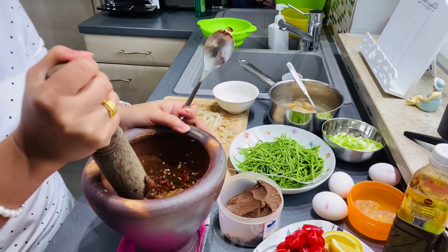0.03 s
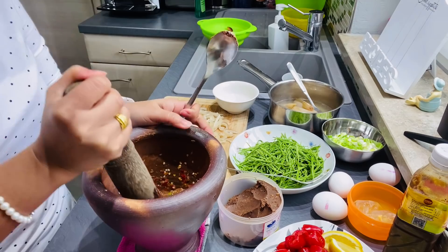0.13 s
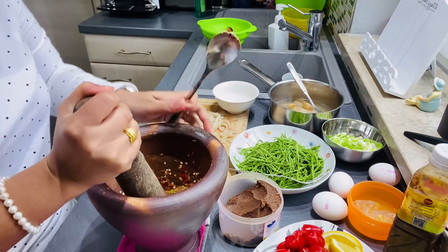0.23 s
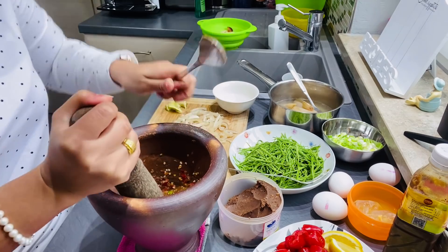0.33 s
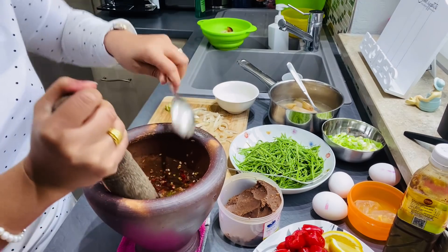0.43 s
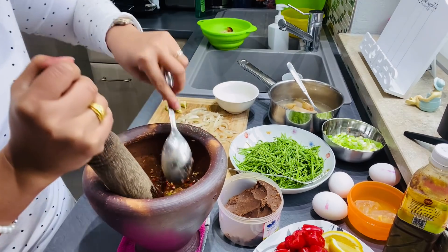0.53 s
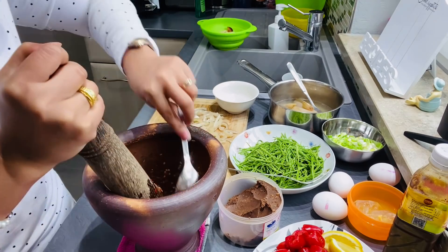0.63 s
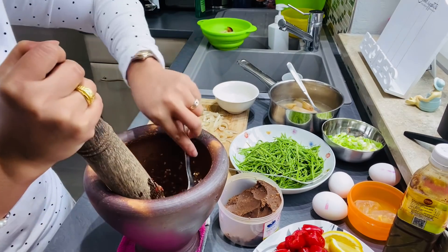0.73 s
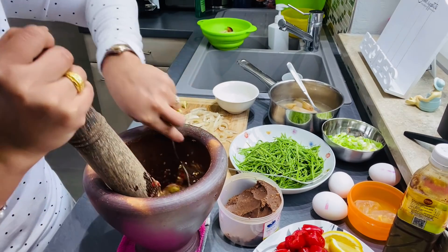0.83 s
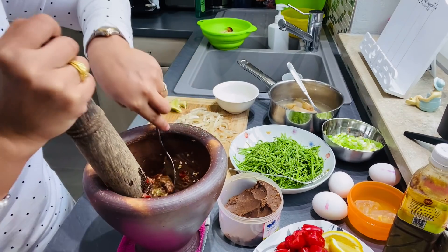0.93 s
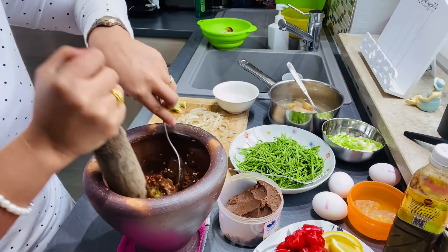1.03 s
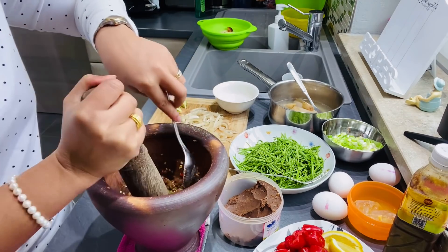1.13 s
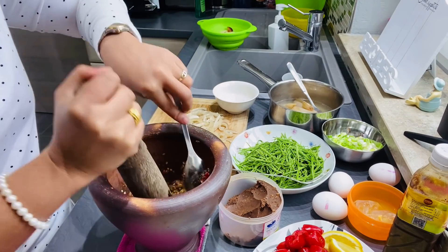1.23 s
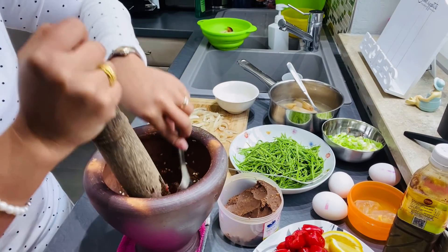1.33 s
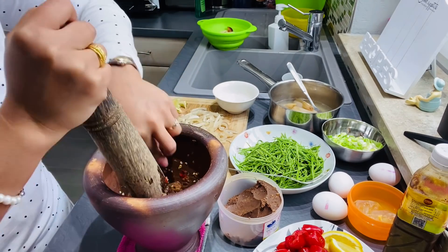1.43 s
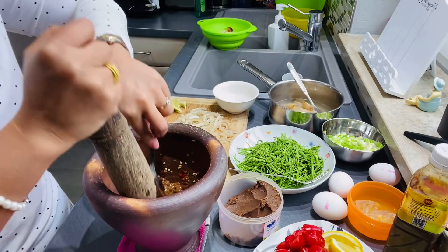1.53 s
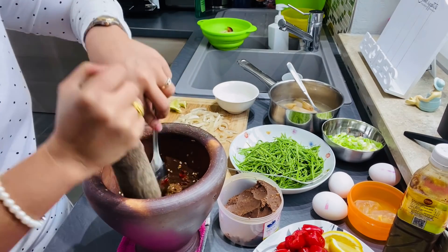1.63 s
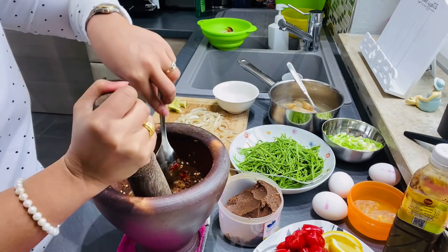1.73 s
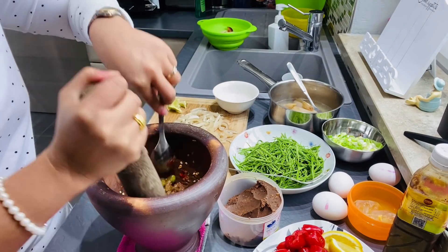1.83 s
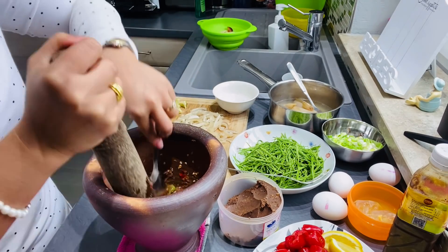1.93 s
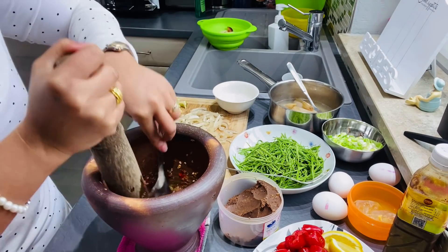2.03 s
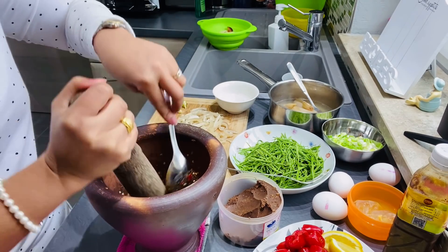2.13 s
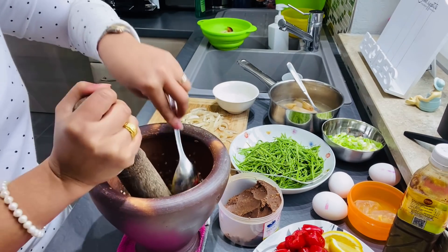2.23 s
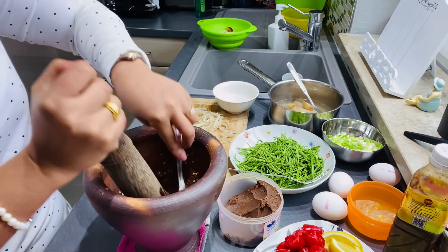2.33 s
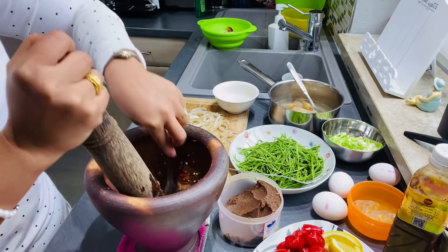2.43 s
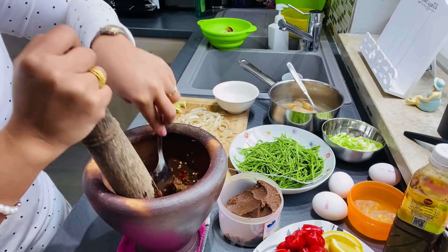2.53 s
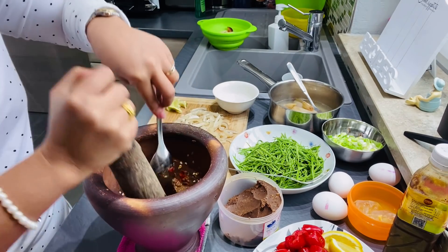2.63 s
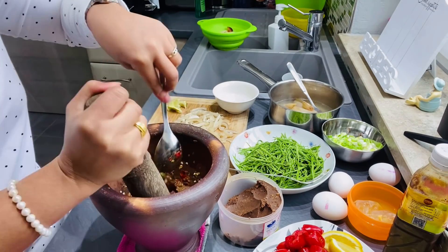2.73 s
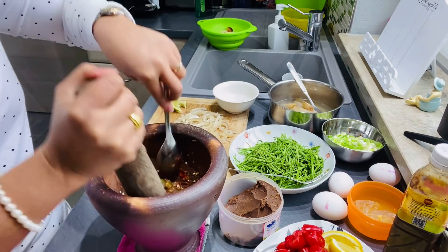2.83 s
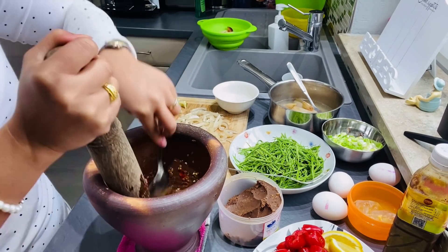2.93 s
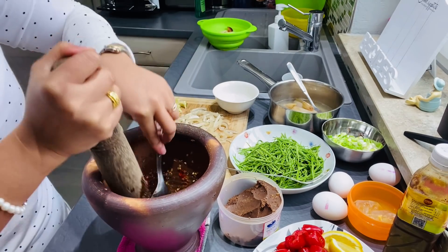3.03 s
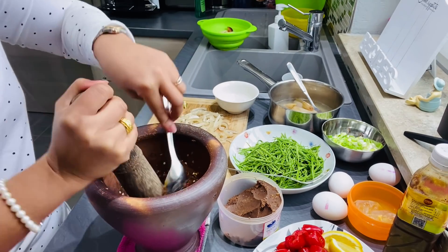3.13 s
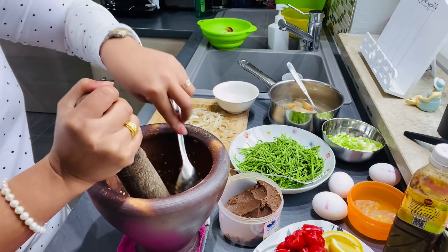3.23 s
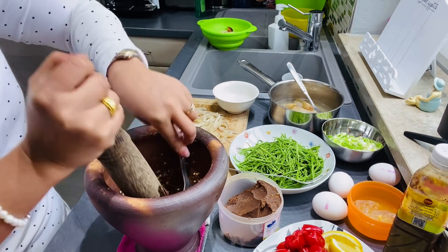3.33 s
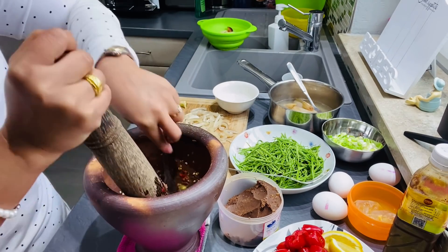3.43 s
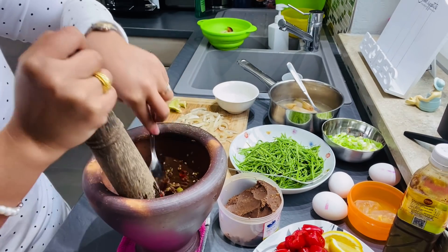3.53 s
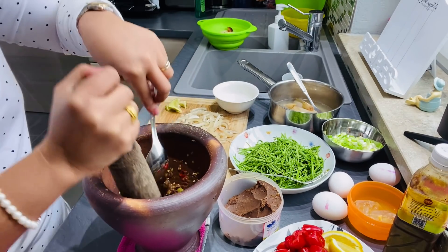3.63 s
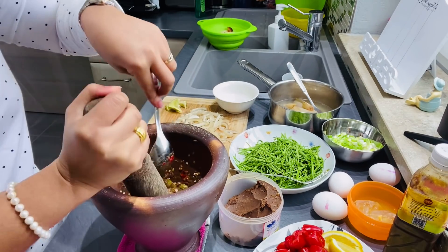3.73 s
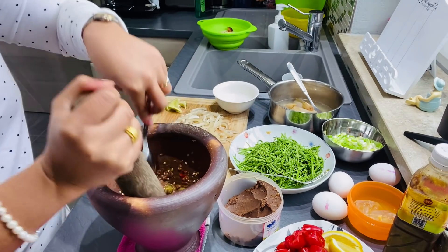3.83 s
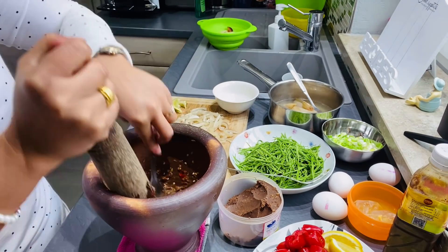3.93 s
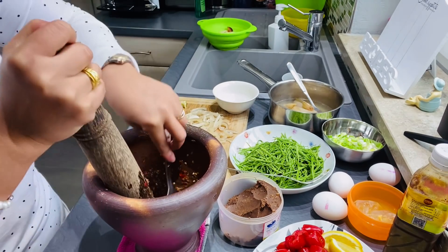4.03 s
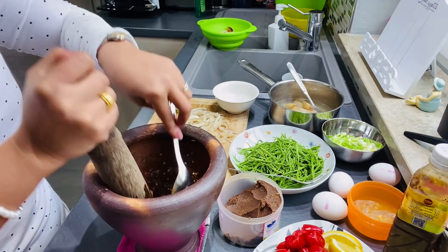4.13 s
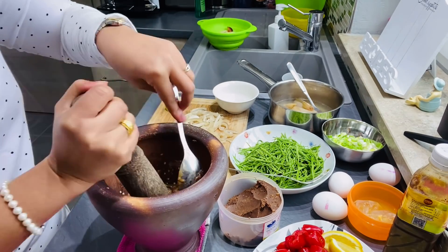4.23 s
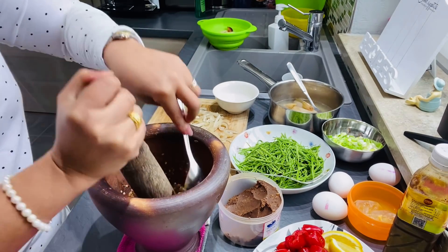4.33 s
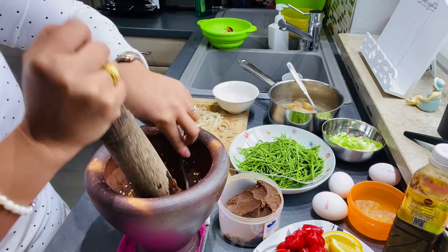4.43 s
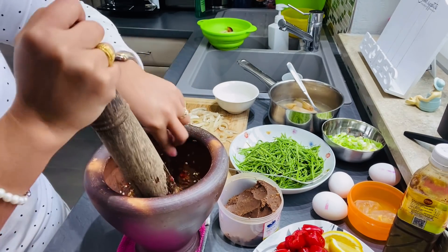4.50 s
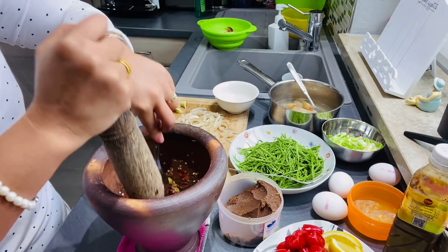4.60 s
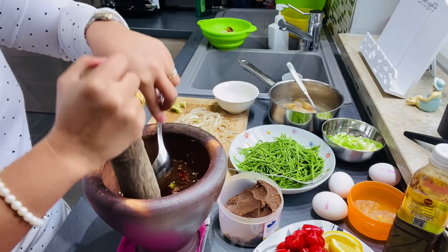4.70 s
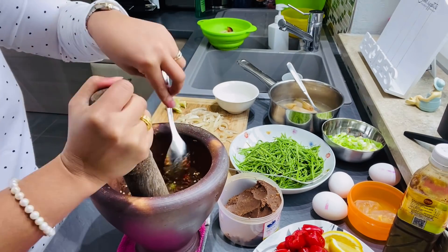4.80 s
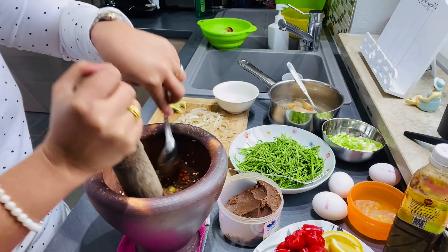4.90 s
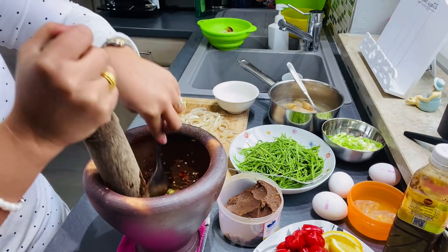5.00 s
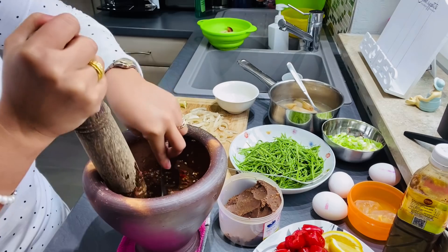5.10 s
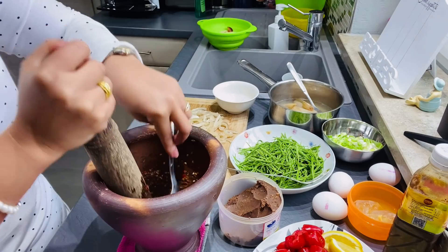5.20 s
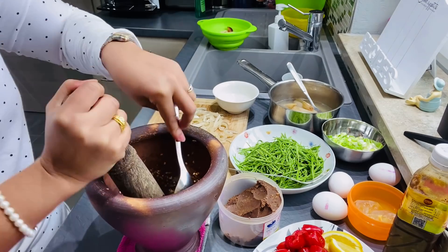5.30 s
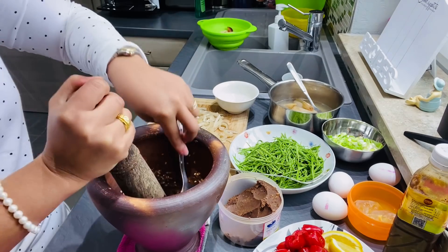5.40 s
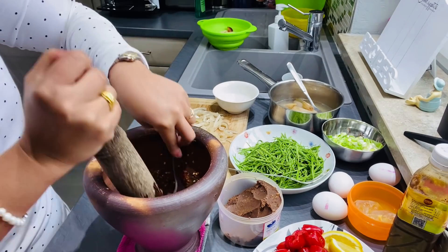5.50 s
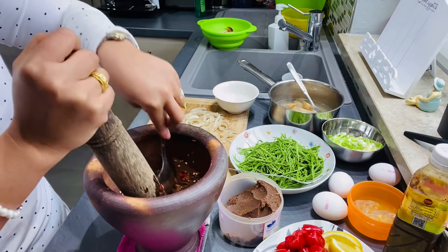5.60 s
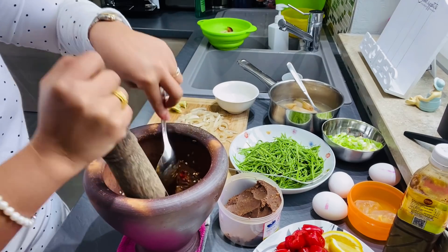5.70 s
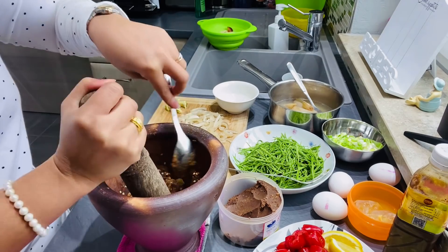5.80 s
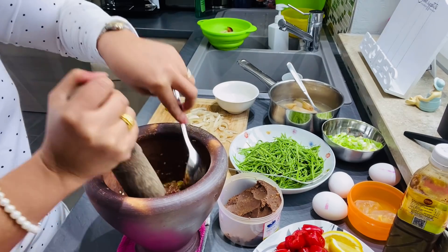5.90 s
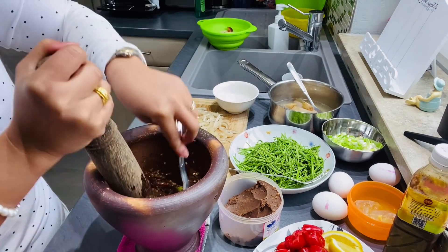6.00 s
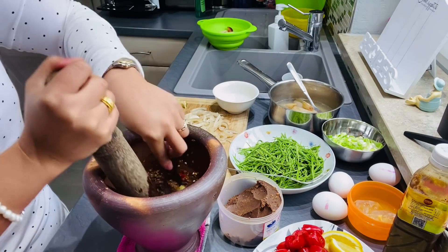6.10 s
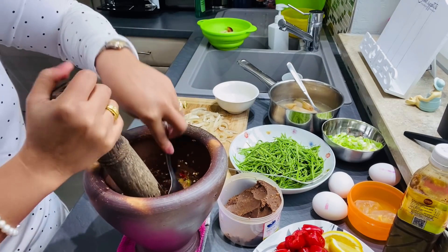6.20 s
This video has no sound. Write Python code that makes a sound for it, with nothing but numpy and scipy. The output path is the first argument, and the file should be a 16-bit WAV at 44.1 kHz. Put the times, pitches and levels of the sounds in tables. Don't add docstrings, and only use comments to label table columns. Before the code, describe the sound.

A close stereo phone pickup in a small, hard kitchen with a faint low hum. At 0-0.5 s the spoon ticks lightly, the worktop thumps and the pestle rubs quietly. At 0.6-1.1 s sharp steel ticks and bright gritty slides arrive with a hollow knock. Around 1.35 s the pestle hits bare clay, giving a woody clack and short mid-high ring, with a hard spoon clink. From 1.6 to 2.6 s come thicker thumps, dull paste knocks, small taps and scrapes. A firm clack and bright clink land at 2.87 s, another tick at 3.25 s. The clearest clay ring sounds at 3.45 s, followed by hollow rubbing near 3.9 s. More wall knocks come at 4.5 s, then a crowded clatter and coarse grinding scrape at 4.9-5.1 s. Sparser taps, rubs and soft thumps follow, with faint steel pings at 6.0 s.

```python
import sys
import numpy as np
from scipy import signal
from scipy.fft import rfft, irfft, next_fast_len
from scipy.io import wavfile
from scipy.ndimage import uniform_filter1d, map_coordinates

SR = 44100
rng = np.random.default_rng(int(sys.argv[2]) if len(sys.argv) > 2 else 0)


def boost_factor(decibels):
    exponent = np.asarray(decibels, float) / 20
    return 10 ** exponent


def unload_wav(signal):
    wavfile.write(
        sys.argv[1],
        SR,
        np.round(np.clip(np.atleast_2d(signal).T, -1, 1) * 32767).astype(np.int16),
    )


N = 275757
BLOW_S = np.arange(SR // 3) / SR

# centre_hz, width_hz, level_db
HOLLOW_MODES = [(180, 8.1, -27), (246.6, 9.3, 10.5), (301, 42, 7), (470, 12.2, 11.5), (566, 39, 7.5),
                (687, 40, 6.5), (788, 17.7, 9), (950, 62, 7.5), (1140, 1600, -13.5)]
# centre_hz, width_hz, level_db
WALL_MODES = [(1391, 318, -2), (2323, 442, 4.5), (2465, 910, 2), (3310, 960, -5)]


def unit(x):
    return x / np.sqrt(np.mean(x ** 2) + 1e-20)


def along(points, hz):
    f, v = np.transpose(points)
    return np.interp(np.log(hz + 1), np.log(f + 1), v)


def filtered(x, response):
    m = next_fast_len(x.shape[-1] + 4096)
    spectrum = rfft(x, m) * response(np.fft.rfftfreq(m, 1 / SR))
    return irfft(spectrum, m)[..., :x.shape[-1]]


def resonances(modes):
    def response(f):
        total = 0
        for k, (c, w, db) in enumerate(modes):
            total = total + (-1) ** k * boost_factor(db) * 1j * f * w / (c * c - f * f + 1j * f * w)
        return total
    return response


def ring(modes, t, scatter_db, drift=.0006):
    luck = rng.standard_normal((len(modes), 2))
    return sum(boost_factor(db + scatter_db * a - 60 * t / t60) * np.sin(2 * np.pi * hz * (1 + drift * b) * t)
               for (hz, db, t60), (a, b) in zip(modes, luck))


def glide(hz):
    return np.sin(2 * np.pi * np.cumsum(hz) / SR)


def onset(t, rise_s):
    return 1 - np.exp(-t / rise_s)


def grains(per_s, spread_db, smooth):
    struck = rng.random(N) < per_s / SR
    size = boost_factor(spread_db * np.minimum(rng.exponential(size=N), 3))
    return unit(struck * size * rng.standard_normal(N)) + smooth * rng.standard_normal(N)


def wobble(rate):
    return map_coordinates(rng.standard_normal(int(N * rate / SR) + 4), [np.arange(N) * rate / SR])


def patchy(x, depth_db):
    z = signal.stft(x, nperseg=256)[2]
    field = uniform_filter1d(rng.standard_normal(z.shape), size=4, axis=0)
    field = uniform_filter1d(field, size=6, axis=1)
    return unit(signal.istft(z * boost_factor(depth_db * unit(field)), nperseg=256)[1][:len(x)])


def swells(peak_s, spread_s, peak_db, slope_db):
    knots_s = np.arange(0, N + 64, 64) / SR
    u = (knots_s - peak_s[:, None]) / np.clip(spread_s, .03, 1)[:, None]
    gain = boost_factor(peak_db[:, None] + np.minimum(slope_db[0] * u, -slope_db[1] * u)).sum(axis=0)
    return np.interp(np.arange(N), np.arange(len(gain)) * 64, gain)


def add(track, s, sound):
    track[round(s * SR):][:len(sound)] += sound


def kitchen_hum():
    # freq_hz, level_db_per_hz
    hum_spectrum = [(18, -29.5), (30, 0), (74, 12.5), (207, -12.5), (592, -4.5), (1100, -83.5), (1470, -21),
                    (9000, -34.5), (11700, -68.5), (19800, -120)]
    return boost_factor(-53.5) * unit(filtered(rng.standard_normal(N), lambda f: boost_factor(along(hum_spectrum, f))))


def spoon_contacts():
    # start_s, peak_db, centre_hz, slide_s, trail_db re tick
    slides = [(0.027, -21.5, 7850, 0.16, -12), (.615, -11, 4170, 0.68, -16.5), (.832, -44, 4400, 1, -9),
              (1.03, -5.5, 4260, 0.24, -28.5), (1.253, -32.5, 4570, 0.39, 3),
              (2.2753, -20, 4100, 0.35, -11.5), (2.533, -22.5, 4100, 0.71, -19),
              (3.2468, -9.5, 3120, 0.18, -18.5), (3.292, -35.5, 4430, 0.53, 2.5),
              (3.595, -32.5, 4020, 0.46, -6.5), (4.3345, -32.5, 3700, 0.08, 4),
              (4.6089, -25, 3540, 0.42, -15.5), (5.6409, -19.5, 4540, 0.65, -25.5),
              (5.9233, -20.5, 5450, 0.7, -10.5), (5.9975, -23.5, 2860, 0.77, -21)]
    # start_s, peak_db, centre_hz, slide_s, trail_db re tick
    clacks = [
        (2.3027, -30, 3000, 0.18, -1.5),
        (2.8684, -17, 4400, 0.12, -17),
        (4.3625, -18.5, 3230, 0.45, -12),
        (4.9031, -14.5, 3300, 0.39, -19.5),
    ]
    # start_s, peak_db, centre_hz, wall_db re peak, slide_s
    digs = [(0.2994, -42, 2320, -6.5, 0.11), (1.003, -26.5, 4030, -15, 0.12),
            (1.5726, -29, 6900, -7.5, 0.38), (1.8622, -30.5, 5240, -16, 0.66),
            (1.8915, -18, 2230, -24, 0.28), (2.2335, -34, 1900, -1, 0.092), (2.326, -24.5, 2480, 13, 0.17),
            (2.382, -33.5, 3040, 2, 0.23), (2.7515, -34, 4070, 4, 0.16), (2.7891, -21.5, 3760, -3.5, 0.2),
            (2.8925, -21.5, 2600, 2.5, 0.1), (3.327, -17, 2320, 4.5, 0.03), (3.7481, -34, 4400, -4, 0.2),
            (3.8061, -24.5, 3790, -0.5, 0.4), (3.8748, -22.5, 2940, 0, 0.26),
            (4.8162, -45, 4760, -1.5, 0.18), (4.885, -31.5, 4260, 8, 0.35), (5.4284, -33.5, 3230, 2.5, 0.3)]
    # start_s, peak_db, centre_hz
    taps = [(0.063, -30, 8100), (.8583, -66, 3020), (1.154, -27, 7160), (1.394, -27, 3070),
            (1.608, -21, 3850), (1.7446, -36.5, 4470), (1.7527, -24.5, 3440), (1.8037, -26.5, 2980),
            (1.918, -26, 2500), (1.9944, -24.5, 4100), (2.555, -33.5, 3800), (2.62, -27, 2500),
            (3.027, -28, 2980), (3.0669, -24.5, 2970), (3.193, -29.5, 4140), (3.379, -26.5, 6900),
            (3.5508, -23, 3800), (3.634, -22.5, 8300), (4.119, -28, 3970), (4.146, -21.5, 3040),
            (4.198, -30, 6020), (4.2623, -33, 3400), (4.5927, -25.5, 2550), (4.7, -26, 3500),
            (4.7074, -20, 6850), (4.935, -28.5, 2780), (5.062, -19, 3050), (5.2, -29.5, 6000),
            (5.243, -20, 7200), (5.7385, -31, 2270), (5.839, -29.5, 4300), (2.916, -32, 8000)]
    grip_hz = [2600, 3330, 4154, 5160, 5860, 7600, 8390]
    steel_floor_hz = 1600

    # start_s, peak_db, centre_hz, wall_db, slide_s, trail_db, steel treble top_db
    contacts = []
    for rows, top_db in ((slides, -10), (clacks, -69.5)):
        contacts += [(s, db, hz, -24, slide_s, trail_db, top_db) for s, db, hz, slide_s, trail_db in rows]
    contacts += [(*row, -13, -19.5) for row in digs]
    contacts += [(*row, -11.5, 0.17, -17.5, -13) for row in taps]

    track, t = np.zeros(N + SR), BLOW_S
    grit = boost_factor(2 * wobble(70)) * grains(per_s=1300, spread_db=2.5, smooth=.9)
    crunch = unit(np.pad(patchy(grit, depth_db=2.5), (0, SR)))
    for s, db, hz, wall_db, slide_s, trail_db, top_db in contacts:
        slide = t / np.clip(slide_s, .02, .6)
        trail = boost_factor(trail_db - 20 * slide - 164.0 * slide ** 2) * onset(t, 0.0013)
        strike = boost_factor(-60 * t / .009) * rng.standard_normal(len(t))
        held = [(f * (1 + .05 * (u - .5)), .012 * f, 11 - 12 * (7 * u % 1))
                for f, u in zip(grip_hz, rng.random(7))]

        def tone(f):
            colour = resonances([(hz, 1.6 * hz, 0)])(f) ** 2 - resonances([(11000, 9000, top_db)])(f)
            return colour * (1j * f / (steel_floor_hz + 1j * f)) ** 2 * (1 + resonances(held)(f))

        crushed = trail * crunch[round(s * SR):][:len(t)]
        tick, crush = filtered(np.array([strike, crushed]), tone)
        steel = (tick + crush) / np.abs(tick).max()
        wall = filtered((strike + 2.0 * trail) * rng.standard_normal(len(t)), resonances(WALL_MODES))
        add(track, s, boost_factor(db) * (steel + boost_factor(min(wall_db, 8)) * wall / np.abs(wall).max()))
    return track[:N]


def worktop():
    # freq_hz, pitch_unsteadiness_hz
    top_modes = [(58.6, 4), (98.6, 9)]
    # peak_s, spread_s, low_mode_db, upper_mode_db, upper_lead_s
    pushes = [(0.062, 0.14, -33, -39.5, 0.0037), (.5, 0.35, -47.5, -44.5, 0.049),
              (1.11, 0.23, -31.5, -35, 0.032), (1.688, 0.18, -26, -31.5, 0.13),
              (2.1, 0.15, -24.5, -28.5, 0.02), (2.35, 0.029, -48, -33.5, 0.01),
              (2.582, 0.18, -24.5, -29, 0.0014), (3.12, 0.19, -26.5, -29.5, 0.037),
              (3.64, 0.23, -30.5, -32, 0.016), (4.25, 0.43, -36, -35.5, 0.092),
              (4.789, 0.2, -31, -31.5, 0.14), (5.292, 0.25, -31, -34.5, 0.11), (5.75, 0.14, -30, -36, 0.05),
              (6.15, 0.19, -30.5, -36, 0.053)]
    slope_db = (22.5, 25.2)

    low, upper = [glide(hz + drift_hz * wobble(25)) for hz, drift_hz in top_modes]
    s, spread, low_db, upper_db, lead = np.transpose(pushes)
    low_load = swells(s, spread, low_db, slope_db)
    upper_load = swells(s - lead, spread, upper_db, slope_db)
    creak = filtered(grains(per_s=60, spread_db=2, smooth=.8), resonances([(135, 40, 0), (200, 90, -5)]))
    upper = upper + 0.23 * unit(creak)
    low = low_load * boost_factor(-3.5 + 2.5 * wobble(30)) * low
    return low + upper_load * boost_factor(-3.5 + 4.5 * wobble(30)) * upper


def pestle_rubs():
    # peak_s, spread_s, hollow_db, clay_ring_db
    rubs = [(0.071, 0.18, -47, -75), (0.368, 0.043, -58, -55), (.42, 0.092, -62, -47),
            (0.48, 0.15, -84.5, -44), (.56, 0.12, -83, -52.5), (0.67, 0.16, -47, -32),
            (.82, 0.58, -52, -53.5), (1.44, 0.25, -33, -36.5), (1.58, 0.063, -63, -84),
            (1.82, 0.17, -83, -54), (1.941, 0.088, -36.5, -32.5), (2.42, 0.31, -48, -84),
            (2.599, 0.11, -39, -47.5), (2.84, 0.089, -60, -34.5), (2.939, 0.11, -32, -46),
            (3.0, 0.098, -49.5, -35.5), (3.53, 0.19, -33, -36), (3.9, 0.078, -31, -84.5),
            (4.09, 0.11, -57, -48.5), (4.22, 0.22, -43.5, -64), (4.63, 0.14, -37, -40),
            (5.08, 0.34, -43.5, -43), (5.972, 0.15, -39.5, -44),]
    # centre_hz, width_hz, level_db
    stirred_air = [(593, 310, 7.5), (263, 200, -1.5)]

    s, spread, hollow_db, ring_db = np.transpose(rubs)
    rubbing = grains(per_s=300, spread_db=2.5, smooth=.8)
    body = lambda f: resonances(HOLLOW_MODES)(f) * (.25 + resonances(stirred_air)(f))
    hollow = unit(boost_factor(2.5 * wobble(30)) * filtered(rubbing, body))
    clay = lambda f: resonances([(1482, 55, 0), (3810, 130, -13)])(f) ** 2
    sing = unit(filtered(rng.standard_normal(N), clay))
    hollow = swells(s, spread, hollow_db - 3.0, (25.8, 19)) * hollow
    return hollow + swells(s, spread, ring_db - 0.5, (45, 45)) * sing


def spoon_scrapes():
    # peak_s, spread_s, grit_db, deep_grind_db
    scrapes = [(.12, 0.12, -49.5, -58), (0.401, 0.2, -58.5, -62.5), (.68, 0.064, -33, -62),
               (.78, 0.14, -55, -79), (0.844, 0.067, -31.5, -44.5), (1.089, 0.19, -43, -52.5),
               (1.291, 0.093, -34, -37.5), (1.418, 0.12, -99, -34), (1.64, 0.72, -54.5, -74),
               (1.928, 0.06, -45, -43), (2.073, 0.14, -44, -44.5), (2.45, 0.26, -58, -70),
               (2.51, 0.13, -70, -43), (2.898, 0.2, -40.5, -35.5), (3.0, 0.066, -57, -44),
               (3.08, 0.083, -44, -48), (3.32, 0.081, -35.5, -35.5), (3.37, 0.12, -47, -37),
               (3.45, 0.06, -83, -64), (3.88, 0.23, -51.5, -41), (4.2, 0.22, -55.5, -76),
               (4.382, 0.13, -101, -42), (4.74, 0.84, -56, -66), (4.945, 0.03, -34, -21),
               (4.986, 0.082, -40, -29), (5.1, 0.38, -83, -57.5), (5.242, 0.39, -61, -86),
               (5.954, 0.17, -53, -39)]
    # freq_hz, level_db_per_hz
    grit_spectrum = [(1500, -75.5), (2800, -1.5), (3500, 9), (4200, 10.5), (5200, 14.5), (6300, 8),
                     (8000, 9), (10500, 5), (12500, 2), (14000, 0), (15600, -1)]
    slope_db = (31.4, 23.2)

    s, spread, grit_db, grind_db = np.transpose(scrapes)
    fine = patchy(grains(per_s=2000, spread_db=2.5, smooth=1.2), depth_db=3)
    fine = filtered(fine, lambda f: boost_factor(along(grit_spectrum, f)))
    grit = unit(boost_factor(2 * wobble(40)) * fine)
    coarse = patchy(grains(per_s=900, spread_db=2.5, smooth=.7), depth_db=2.5)
    coarse = filtered(coarse, lambda f: resonances(WALL_MODES)(f) * 1j * f / (1500 + 1j * f))
    grind = unit(boost_factor(2 * wobble(60)) * coarse)
    grit = swells(s, spread, grit_db, slope_db) * grit
    return grit + swells(s, spread, grind_db, slope_db) * grind


def pestle_knocks():
    # start_s, peak_db, hollow_hz, air_bloom_db re peak
    paste_knocks = [(.353, -32, 396, -8), (.614, -37, 569, -0.5), (.83, -38.5, 654, -11),
                    (.904, -45, 294, -10), (1.005, -41, 305, -3), (1.029, -21.5, 546, -12),
                    (1.315, -36, 535, -2), (1.397, -20.5, 584.6, -5.5), (1.645, -29, 510, -13),
                    (1.887, -41, 690, -8), (1.906, -39.5, 565, 12), (1.966, -23, 782, -8.5),
                    (2.292, -39, 820, -10), (2.314, -30.5, 645, -7), (2.33, -29, 640, -5),
                    (2.381, -35.5, 814, -25), (2.868, -31.5, 558, -8), (2.899, -25, 330, -28),
                    (2.908, -27, 591, 0), (3.247, -36, 606, -5.5), (3.326, -39.5, 540, 7.5),
                    (3.372, -23, 850, -4.5), (3.381, -27, 602, -2), (3.644, -34, 529, -9),
                    (3.873, -26, 593, -9.5), (3.912, -22.5, 579, -10), (4.12, -31.5, 632, -8),
                    (4.198, -32, 582, -1), (4.335, -34.5, 767, -2.5), (4.468, -23, 860, -10),
                    (4.872, -34.5, 325, -33), (4.902, -29.5, 648, -10.5), (4.936, -26.5, 786, -3),
                    (4.972, -30.5, 330, -33.5), (4.982, -23.5, 637, -0.5), (4.997, -22, 603.5, -4.5),
                    (5.063, -22, 656, -6.5), (5.072, -24, 727, -12.5), (5.145, -43, 297, -7),
                    (5.2, -44.5, 323, -6.5), (5.25, -31, 764, -9), (5.43, -29, 835, -4),
                    (5.64, -23.5, 606, -12), (5.976, -27.5, 295, -31), (6.035, -34, 540, -5.5),
                    (6.098, -28, 570, -8)]
    # start_s, peak_db, clay_ring_db re peak, upper_ring_db re peak, lower_twin_db of split mode
    wall_knocks = [(1.3422, -14, -8, -24, -10), (3.4433, -14, -9, -22, -10), (1.905, -27.5, -16, -30, -20),
                   (2.328, -35, -18, -30, -4), (2.483, -20.5, -10.5, -18, -25), (2.537, -33, -12, -9, 0),
                   (2.789, -42, 13, 8, -4), (2.964, -33, -14, -30, 0), (3.496, -23, -8, -14, -16),
                   (3.805, -33, 2, 0, -26), (4.336, -42, 6, -10, -4), (4.362, -36, -12, -26, 0),
                   (4.5015, -14, 3, -12, 0), (4.554, -17, -11, -12, -1), (4.583, -22, -6, -16, -8),
                   (1.477, -27, -8, -30, -8), (1.428, -28, -8, -30, -8), (5.813, -35.5, 12.5, -3.5, -18.5)]
    # freq_hz, level_db, t60_s
    clay_modes = [(1469, 0, .175), (1487, 0, .175), (2300, -20, .05), (1152, -14, .04)]
    # freq_hz, level_db, t60_s
    upper_modes = [(3810, -19, .09), (3780, -5, .028), (3220, -22, .04)]
    # centre_hz, width_hz, level_db
    slap_modes = [(800, 1300, 0), (2250, 900, -3)]
    wall_hollow_hz, wall_bloom_db = 747, -17
    choked_db, choked_upper_db = -26.5, -13
    wall_mix, paste_mix = (-9.5, 2.5, -0.5, 7.5), (-4.5, -17.5, -5, -11)

    knocks = [(*row, wall_hollow_hz, wall_bloom_db, wall_mix) for row in wall_knocks]
    knocks += [(s, db, choked_db, choked_upper_db, 0, hz, bloom_db, paste_mix)
               for s, db, hz, bloom_db in paste_knocks]

    track, t = np.zeros(N + SR), BLOW_S
    squelch = np.pad([wobble(45), wobble(60)], ((0, 0), (0, SR)))
    slap = filtered(np.exp(-t / .00025), resonances(slap_modes))
    slap = slap / np.abs(slap).max()
    for s, db, ring_db, upper_db, twin_db, hz, bloom_db, mix in knocks:
        body_db, slap_db, thud_db, bright_db = mix
        push = (1 - t / 0.0016) * np.exp(-t / 0.0011)
        rattle = 0.6 * boost_factor(-60 * t / 0.046) * rng.standard_normal(len(t))
        focus = resonances([(hz, 0.57 * hz, 0), (1900, 1500, bright_db + 1)])
        bowl = resonances(HOLLOW_MODES + WALL_MODES[:2])
        body = filtered(push + rattle, lambda f: focus(f) * (0.57 + bowl(f)))
        body = body / np.abs(body).max()

        if hz == wall_hollow_hz:
            note_hz, t60 = 330 + (942 - 330) * np.exp(-t / 0.00426), 0.031
        else:
            note_hz, t60 = hz + 0 * t, 0.043
        thud = boost_factor(-60 * t / t60) * glide(note_hz) * onset(t, 0.00036)

        bend, flutter = squelch[:, round(s * SR):][:, :len(t)]
        rise_hz = min(hz, 660) * (.95 + .035 * bend + .12 * onset(t, .07))
        gulp = boost_factor(bloom_db + 4 * flutter - 60 * t / .23) * glide(rise_hz) * onset(t, .012)

        twin = boost_factor(twin_db) * ring(clay_modes[:1], t, scatter_db=.4, drift=0)
        clay = boost_factor(ring_db) * (twin + ring(clay_modes[1:], t, scatter_db=.4, drift=0))
        clay = clay + boost_factor(upper_db) * ring(upper_modes, t, scatter_db=2)
        blow = boost_factor(body_db) * body + boost_factor(slap_db) * slap + boost_factor(thud_db) * thud
        add(track, s, boost_factor(db) * (blow + gulp + clay * onset(t, 0.0007)))
    return track[:N]


def edge_strikes():
    # start_s, peak_db, treble_tilt_db per octave
    strikes = [(0.617, -29.5, -18), (0.656, -45, 0), (0.674, -50, -2), (3.848, -28, -1),
               (1.0315, -36.5, 21.5), (3.905, -27, -2.5), (1.806, -33.5, -3), (1.862, -33, -3),
               (1.907, -38, -5), (1.9165, -23, -14), (1.933, -31, -21), (1.997, -44, 8), (3.8069, -23, 4),
               (1.3953, -14, -9), (2.2755, -43, -1), (2.2999, -29, -1), (2.314, -24.5, -6),
               (2.7517, -29.5, 5), (2.325, -52, -2), (2.8673, -13.5, 5), (2.8914, -33, 10),
               (2.961, -29.5, -17.5), (3.001, -32, -6), (3.022, -35, -14), (3.048, -40, -24),
               (3.065, -31.5, -15), (3.2462, -35.5, -23), (3.327, -31, -4.5), (4.338, -44, 3),
               (4.8869, -22.5, 3), (4.9023, -14.5, 1), (4.9345, -26, -1), (4.9398, -41, 3),
               (4.9449, -30, -5.5), (4.966, -25.5, -2), (4.9715, -27.5, -10), (4.9883, -31.5, -11),
               (4.948, -23, -11), (4.958, -18.5, -7.5), (4.977, -24, -14), (4.995, -33, -12.5),
               (5.063, -50, -3), (5.9222, -37, 8), (5.952, -49, 1), (6.076, -33.5, -13)]
    # freq_hz, level_db, t60_s
    edge_modes = [(1490, -10, .04), (2240, 0, .028), (2780, -7, .025), (3480, -10, .025), (4170, -4, .03),
                  (5180, -8, .022), (5500, -9, .025)]
    track, t = np.zeros(N + SR), BLOW_S
    for s, db, tilt_db in strikes:
        tilted = [(hz, level + tilt_db * np.log2(hz / 2240), t60) for hz, level, t60 in edge_modes]
        add(track, s, boost_factor(db) * ring(tilted, t, scatter_db=2.5, drift=.015) * onset(t, .0004))
    return track[:N]


def spoon_pings():
    # start_s, peak_db, pitch_hz
    pings = [
        (0.856, -44, 2910),
        (5.9983, -38.5, 2826),
        (6.011, -38.5, 2940),
    ]
    # multiple of pitch_hz, level_db, t60_s
    steel_modes = [(1, 13, 0.038), (1.007, -6, 0.25), (1.472, 2, 0.13)]
    track = np.zeros(N + SR)
    for s, db, hz in pings:
        modes = [(k * hz, level, t60) for k, level, t60 in steel_modes]
        add(track, s, boost_factor(db + 1.0) * ring(modes, BLOW_S, scatter_db=-5.5))
    return track[:N]


def free_wall_rings():
    # start_s, ring_db, free_s
    free_rings = [
        (1.343, -24.5, 0.041),
        (3.447, -16.5, 0.042),
        (4.558, -22, 0.017),
        (3.812, -33, .045),
    ]
    free_hz, rise_s, choke_t60_s = 1490, 0.002, 0.12
    track, t = np.zeros(N + SR), BLOW_S
    for s, db, free_s in free_rings:
        decay = boost_factor(db - 60 * np.maximum(t - free_s, 0) / choke_t60_s)
        add(track, s, decay * onset(t, rise_s) * np.sin(2 * np.pi * free_hz * t))
    return track[:N]


def kitchen_echo(near):
    # freq_hz, t60_s
    kitchen_t60 = [(100, 0.23), (600, 0.66), (2000, 0.42), (8000, 0.13), (15000, 0.019)]
    hz, t, z = signal.stft(rng.standard_normal(int(0.19 * SR)), SR, nperseg=256)
    x = signal.istft(z * boost_factor(-60 * t / along(kitchen_t60, hz)[:, None]), SR, nperseg=256)[1]
    delayed = np.pad(near, (250, 0))
    return boost_factor(-17) * signal.fftconvolve(delayed, x / np.linalg.norm(x))[:N]


def scrambled(x):
    z = signal.stft(x, nperseg=256)[2]
    drift = rng.standard_normal((2, *z.shape))
    lag, lean = unit(uniform_filter1d(uniform_filter1d(drift, size=3, axis=1), size=4, axis=2))
    return signal.istft(z * (1j * np.clip(2 * lag, -1, 1) + .35 * lean), nperseg=256)[1][:N]


def at_ports(shared):
    # freq_hz, likeness 0-1
    likeness = [(60, .99), (130, .91), (300, .52), (700, .5), (1500, .72), (3500, .5), (5500, .5),
                (7400, .88), (8800, .9), (9700, .998), (11400, .998), (12000, .96), (14300, .96),
                (15000, .993)]

    def mid_side(f):
        turn = np.arccos(np.clip(along(likeness, f), -1, 1)) / 2
        return np.array([np.cos(turn), np.sin(turn)])

    mid, side = filtered(np.array([shared, 1.45 * scrambled(shared)]), mid_side)
    return np.array([mid + side, mid - side])


def scene():
    spoon = spoon_contacts() + spoon_scrapes() + edge_strikes() + spoon_pings()
    pestle = pestle_rubs() + pestle_knocks() + free_wall_rings()
    near = spoon + pestle
    return at_ports(near + kitchen_echo(near) + kitchen_hum()) + worktop()


def roll_off(x):
    return signal.sosfilt(signal.butter(12, 16800, fs=SR, output="sos"), x)


def record(dry):
    # freq_hz, level_db
    mic_response = [(30, -17), (50, 3), (100, 3.5), (8000, -2.5), (11000, 0.5), (13000, -2.5), (15500, -5)]
    # freq_hz, level_db
    balance = [(60, -2), (400, -2.5), (4400, -1.8), (7500, 0), (15000, 0)]
    # freq_hz, half_turns
    right_lead = [(0, 0), (1700, .08), (4500, .1), (5700, .75), (7100, .15), (8000, 0), (8900, -.2),
                  (9750, -.95), (11300, -1.05), (12300, -2), (13900, -2), (14700, -3)]
    half = np.array([[.5], [-.5]])

    def ports(f):
        gain = boost_factor(along(mic_response, f) + half * along(balance, f))
        phase = np.exp(-1j * np.pi * half * np.interp(f, *np.transpose(right_lead)))
        return gain * phase * (f < 16500)

    return roll_off(filtered(dry, ports))


dry = scene()
out = record(dry)
unload_wav(out)
```